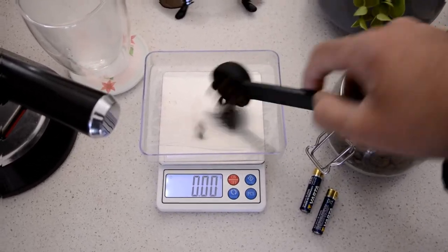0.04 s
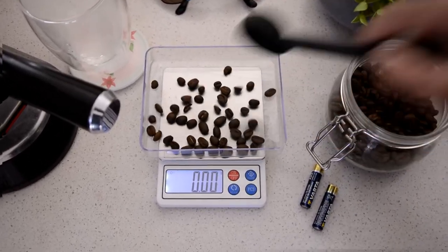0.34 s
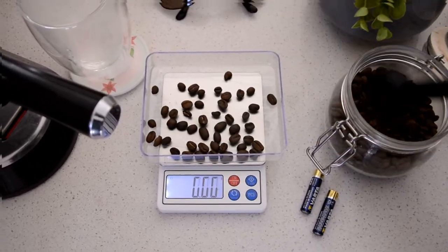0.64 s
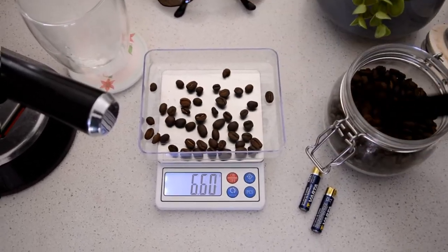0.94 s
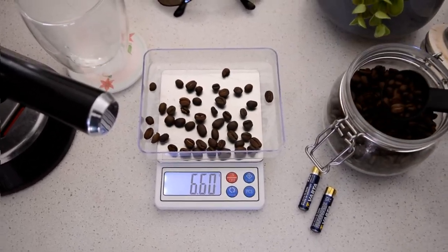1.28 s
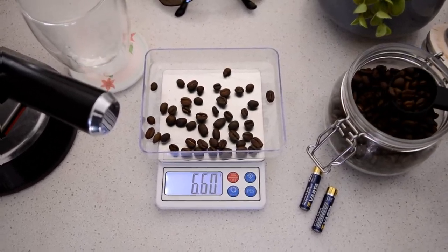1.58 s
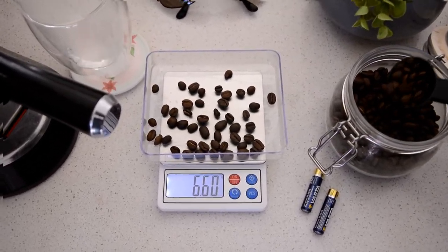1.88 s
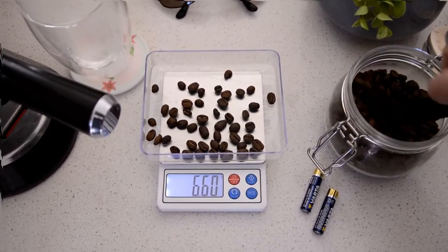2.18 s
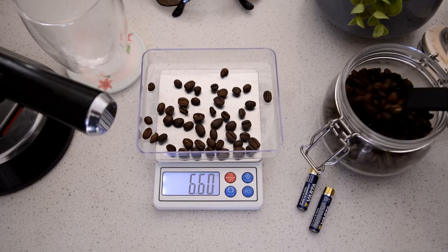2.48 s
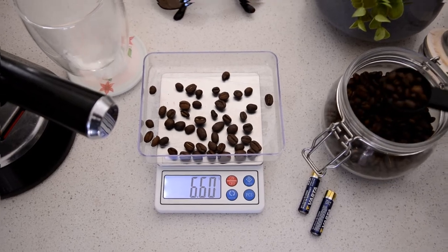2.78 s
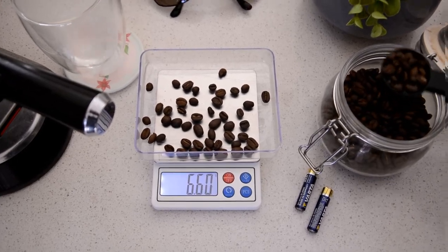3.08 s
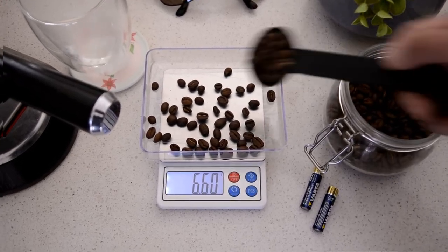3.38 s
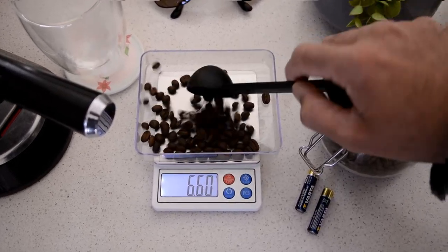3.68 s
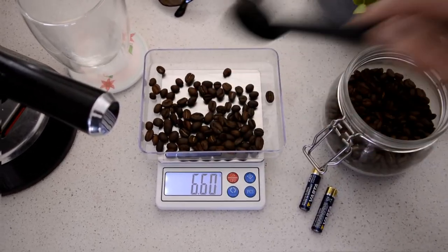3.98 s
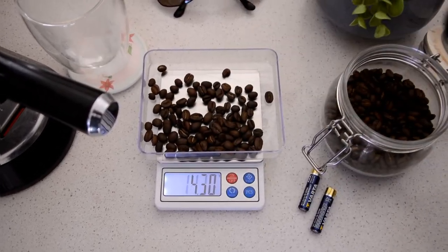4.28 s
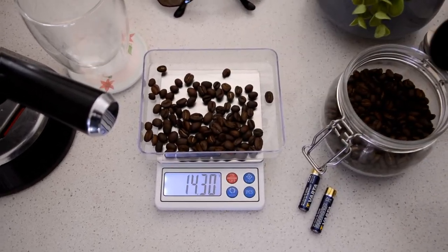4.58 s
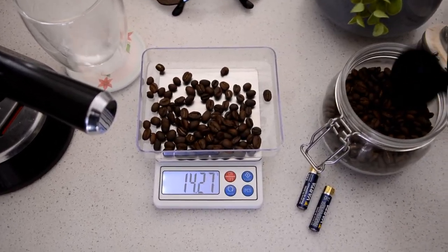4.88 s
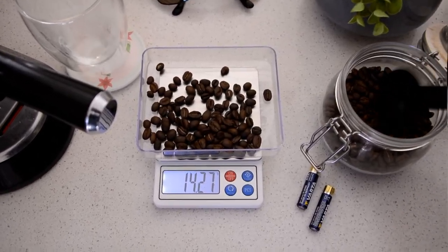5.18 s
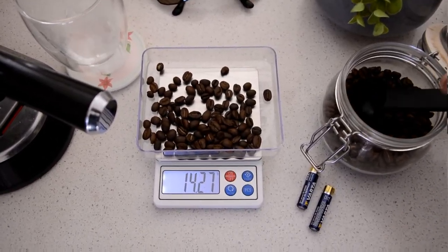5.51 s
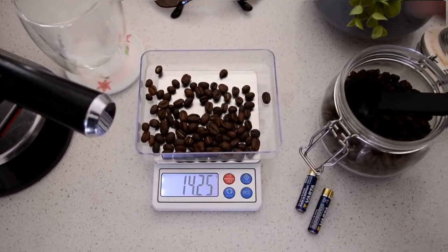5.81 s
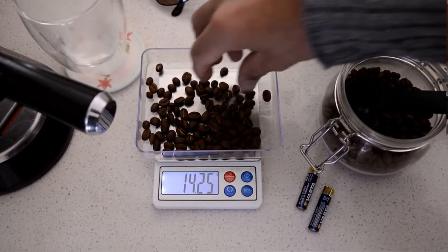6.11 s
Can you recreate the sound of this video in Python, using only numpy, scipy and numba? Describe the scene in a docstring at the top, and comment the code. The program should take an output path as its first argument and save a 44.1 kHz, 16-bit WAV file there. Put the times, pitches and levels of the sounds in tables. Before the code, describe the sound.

A fast, even rattle with soft thuds runs over a steady whir in a small kitchen, growing brighter as it goes. Close by, coffee beans click and bounce into a ringing plastic tray. A scoop scrapes and stirs through beans in a glass jar, then tips a second load into the tray. Faint stirring follows, while scattered ticks and hollow knocks continue to the end.

```python
"""A small, hard kitchen. Two scoops of roasted coffee beans are tipped into the plastic tray of a small
scale, clicking and ringing it; between them the scoop digs in a glass jar, where beans rub and slip.
All the while a fast, even rattle runs over a steady whir: eleven beats a second, each with two blows
and a soft thud, dull at first and brighter later, with stray ticks and hollow knocks."""
import sys
import numpy as np
from scipy import signal
from scipy.fft import rfft, irfft
from scipy.io import wavfile
from numba import njit

SR = 44100
rng = np.random.default_rng(int(sys.argv[2]) if len(sys.argv) > 2 else 0)


def wav_out(sig):
    """Save sig, one row per channel (or a flat mono array), as 16-bit PCM at SR to the path in sys.argv[1]."""
    wavfile.write(sys.argv[1], SR, np.round(np.clip(np.atleast_2d(sig).T, -1, 1) * 32767).astype(np.int16))


N = 275625
T = np.arange(N) / SR
SIDES = np.array([[1], [-1]])
BEAT_S = 4000 / SR  # one beat of the rattle
TOP_HZ = 15950


def amp(db):
    """Decibels to gain."""
    return 10 ** (np.asarray(db) / 20)


def unit(x):
    """Scale to rms 1."""
    return x / np.sqrt(np.mean(x ** 2))


def low_cut(x, hz):
    """Roll off the lows, 12 dB an octave."""
    return signal.sosfilt(signal.butter(2, hz, "high", fs=SR, output="sos"), x)


def colour(x, points, size=4096):
    """Minimum-phase EQ through (Hz, dB) points; the result has rms 1."""
    hz, db = np.transpose(points)
    bins = np.maximum(np.fft.rfftfreq(size, 1 / SR), 1)
    gain = amp(np.interp(np.log(bins), np.log(hz), db))
    cepstrum = irfft(np.log(gain))
    cepstrum[1:size // 2] *= 2
    cepstrum[size // 2 + 1:] = 0
    impulse = irfft(np.exp(rfft(cepstrum)))
    return unit(signal.fftconvolve(x, impulse[None])[:, :N])


def noise(side_db):
    """White noise; side_db sets its stereo width."""
    mid, side = rng.standard_normal((2, N))
    return unit(mid + amp(side_db) * side * SIDES)


def contacts(per_s, spread_db):
    """Tiny impacts at random moments, of uneven size and either sign."""
    hits = (rng.random(N) < per_s / SR) * rng.choice([-1, 1], N)
    return unit(hits * amp(spread_db * np.clip(rng.standard_normal(N), -2, 2)))


def grains(per_s, spread_db, side_db):
    """A dense, dry stereo crunch of tiny contacts."""
    return unit(contacts(per_s, spread_db) * noise(side_db))


def tails(hits, fall_s):
    """An envelope that jumps at each hit and decays."""
    return signal.lfilter([1], [1, -np.exp(-1 / (fall_s * SR))], np.abs(hits))


def swell(age, rise_s, fall_s):
    """Envelope of a blow: it builds up to age 0, then dies away."""
    return np.exp(np.minimum(age / rise_s, -age / fall_s))


def blows(times, levels_db, rise_s, fall_s, lag=2):
    """Summed envelopes of blows; each peaks lag rise times after its cue."""
    out = np.zeros(N)
    for s, db in zip(times, levels_db):
        near = slice(max(int(s * SR) - SR // 20, 0), int(s * SR) + SR // 5)
        out[near] += amp(db) * swell(T[near] - s - lag * rise_s, rise_s, fall_s)
    return out


def gestures(moves, attack_s, sag_db_per_s, release_db_per_s):
    """Summed envelopes of scoop moves: attack, a sagging hold, release."""
    out = np.zeros(N)
    for start_s, db, hold_s in moves:
        age = T - start_s
        held = np.maximum(age - attack_s, 0)
        drop_db = sag_db_per_s * held + release_db_per_s * np.maximum(held - hold_s, 0)
        out += np.clip(age / attack_s, 0, 1) ** 2 * amp(db - drop_db)
    return out


@njit
def ping_cloud(rows, fall_s, n):
    """Add up decaying sines, one for each (s, Hz, size, left phase, right phase)."""
    out = np.zeros((2, n))
    for s, hz, size, left, right in rows:
        step = np.exp((2j * np.pi * hz - 1 / fall_s) / SR)
        a, b = size * np.exp(1j * left), size * np.exp(1j * right)
        start = int(s * SR)
        for i in range(start, min(start + int(5 * fall_s * SR), n)):
            a, b = a * step, b * step
            out[0, i] += a.imag
            out[1, i] += b.imag
    return out


def pings(count, spread_db, fall_s, width_rad):
    """A cloud of tiny hard contacts, each ringing briefly at its own pitch; even in spectrum."""
    when, height, cycle = rng.random((count, 3)).T
    size, skew = np.clip(rng.standard_normal((count, 2)), -2, 2).T
    size = amp(spread_db * size) * np.sqrt(height)
    left, right = 2 * np.pi * cycle + width_rad * skew * SIDES
    rows = np.column_stack([when * N / SR, TOP_HZ * height ** 2, size, left, right])
    return unit(ping_cloud(rows, float(fall_s), N))


def rings(times, levels_db, pitches_hz, gain_db, rise_s, fall_s, width_rad, sag_per_s=0):
    """One short ring per cue, its pitch free to sag, its phase split left and right."""
    out = np.zeros((2, N))
    for s, db, hz, width in zip(times, levels_db, pitches_hz, np.broadcast_to(width_rad, len(times))):
        near = slice(max(int(s * SR) - SR // 50, 0), int(s * SR) + SR // 10)
        age = T[near] - s
        envelope = amp(db + gain_db) * swell(age - 0.876 * rise_s, rise_s, fall_s)
        phase = 2 * np.pi * hz * age * (1 - sag_per_s * age / 2)
        out[:, near] += envelope * np.sin(phase + rng.choice([-1, 1]) * width * SIDES)
    return out


def modes(hits, table):
    """Ring a bank of resonances, in a different balance for each hit, with the bass cut away."""
    ring = 0
    for hz, width_hz, db in table:
        r, w = np.exp(-np.pi * width_hz / SR), 2 * np.pi * hz / SR
        mode = signal.lfilter([1, 0, -1], [1, -2 * r * np.cos(w), r * r], hits * noise(side_db=-1))
        ring = ring + amp(db) * np.sqrt(1 - r) * mode
    return unit(low_cut(ring, 800))


# Scoops tipped into the tray. Each row: start in seconds, level in dB, hold in seconds.
POURS = [(-.045, -25, 0.16), (3.42, -25, 0.23)]
# Clumps that land together. Each row: time in seconds, level in dB.
CLUMPS = [(.014, -37), (0.047, -32), (.086, -25), (0.107, -25), (0.186, -30), (3.453, -38), (3.475, -32),
          (3.522, -26), (3.549, -27), (3.654, -32), (3.702, -27)]
# The tray's ring. Each row: pitch in Hz, bandwidth in Hz, level in dB.
TRAY_MODES = [(1372, 81, 1.5), (1660, 210, -0.5), (1900, 130, 1.5), (2475, 165, 8.5), (2970, 190, 1),
              (3280, 63, 0), (3530, 120, -1), (3850, 57, -3), (5030, 69, -1), (5750, 190, 0),
              (6780, 61, 1.5), (8000, 64, -7), (8350, 79, -11), (9400, 47, -6), (11050, 160, 1.5),
              (12300, 45, -17)]
# The bare click of a bean on plastic. Each row: frequency in Hz, gain in dB.
CLICK_EQ = [(60, -48), (200, -36), (480, -23), (750, -2.5), (1050, -2), (1400, 3.5), (2000, -11),
            (2900, -3), (4400, 1), (6500, 3), (9000, -0.5), (12000, 0.5), (16000, -1)]

def pour(ring_db=-4, click_db=-3):
    """Beans land and bounce, some in clumps; each chatters for a moment and rings the tray."""
    stream = gestures(POURS, attack_s=0.034, sag_db_per_s=32, release_db_per_s=98)
    clumps = blows(*np.transpose(CLUMPS), rise_s=0.0023, fall_s=0.0034)
    hits = contacts(per_s=2200, spread_db=3)
    chatter = tails(hits, fall_s=0.0049) * pings(90000, spread_db=2, fall_s=0.0013, width_rad=1.13)
    ring = amp(ring_db) * modes(hits, TRAY_MODES)
    clicks = amp(click_db) * colour(chatter, CLICK_EQ)
    return np.hypot(stream, clumps) * (ring + clicks)


# The tone of the whir. Each row: frequency in Hz, gain in dB.
WHIR_EQ = [(25, -49), (60, -11), (110, -5), (200, -12), (300, -16), (450, -3), (700, 7), (930, 10.5),
           (1400, 1.5), (3200, 0.5), (4500, -7), (6500, -7), (9000, -18.5), (16000, -9.5)]

def whir(level_db=-49):
    """Steady noise, a wide bed under everything."""
    return amp(level_db) * colour(noise(side_db=1), WHIR_EQ)


# Square hits on the bare tray. Each row: time in seconds, level in dB, pitch in Hz.
BEAN_STRIKES = [(.011, -23, 6890), (.012, -26, 1350), (.014, -27, 11210), (.019, -35, 2450),
                (.033, -37, 6830), (.047, -25, 2560), (.072, -39, 6790), (.084, -32, 2400),
                (.089, -24, 3220), (.107, -36, 2400), (3.546, -24.5, 2440), (3.559, -36, 5140),
                (3.567, -30, 2380), (3.596, -30, 2520), (3.607, -24, 6600), (3.614, -27, 2400),
                (3.635, -35, 2470), (3.655, -28, 6700), (3.694, -33, 11200)]

def bean_strikes():
    """A bean that finds the tray's bare floor rings one mode clearly."""
    return rings(*np.transpose(BEAN_STRIKES), gain_db=-2.5, rise_s=0.0018, fall_s=0.0032, width_rad=0.23)


# The rattle's tone over time. Each row: time in seconds, brightness from 0 (dull) to 1.
BRIGHTNESS = [(.5, 0.4), (.75, 0), (1.25, 0.16), (2.05, 0.11), (2.55, 0.22), (3.25, 0.42), (3.9, 0.66),
              (5.2, 0.91), (6.25, 0.85)]

def brightness():
    """How bright the rattle is at each moment."""
    return np.interp(T, *np.transpose(BRIGHTNESS))


def each_beat(at_s, rise_s, fall_s, scatter_db, jitter_s, hz=0, detune=0):
    """One pulse a beat, never quite the same: its envelope, or its ring if it has a pitch."""
    clock = T - at_s + BEAT_S / 3
    beat = np.floor(clock / BEAT_S).astype(int) + 1
    size, late, sharp = rng.standard_normal((N // 1000, 3))[beat].T
    age = clock % BEAT_S - BEAT_S / 3 - jitter_s * late
    tone = np.cos(2 * np.pi * hz * (1 + detune * sharp) * age)
    return amp(scatter_db * size) * swell(age, rise_s, fall_s) * tone


# The soft thud and its deep layer. Each row: frequency in Hz, gain in dB.
THUD_EQ = [(60, -35), (140, -21.5), (195, -10), (228, -19), (270, -2.5), (330, 0.5), (390, -5), (470, -14),
           (800, -16), (2000, -50), (8000, -70)]
DEEP_EQ = [(60, -44), (120, -25), (180, -2.5), (215, -2), (300, 5), (390, -24)]

def thuds(thud_db=-46, bright_drop_db=4, deep_db=-43.5, boom_db=-44.5):
    """The rattle's low end: a soft thud every beat, a deep double bump at first, and a pitched boom."""
    pulse = each_beat(0.0542, rise_s=0.0095, fall_s=0.032, scatter_db=1.5, jitter_s=0.002)
    bump = each_beat(0.0326, rise_s=0.0028, fall_s=0.014, scatter_db=-3.5, jitter_s=0.0008)
    thud = amp(thud_db - bright_drop_db * brightness()) * colour(noise(side_db=-6.5), THUD_EQ)
    # the deep layer swells early, then fades
    deep_fader = amp(deep_db) * swell(T - 0.62, rise_s=0.38, fall_s=1)
    deep = deep_fader * colour(noise(side_db=-28.5), DEEP_EQ)
    # the boom builds slowly to mid-scene and dies away faster
    boom_fader = amp(boom_db) * swell(T - 2.97, rise_s=1.4, fall_s=0.7)
    boom = each_beat(0.07, rise_s=0.049, fall_s=0.016, scatter_db=0.5, jitter_s=0.00027,
                     hz=258.7, detune=0.013)
    return pulse * thud + (bump + amp(-12) * pulse) * deep + boom_fader * boom


# Bright snaps among the beans. Each row: time in seconds, level in dB.
BEAN_SNAPS = [(.05, -29), (.279, -49), (.629, -36), (.705, -40), (1.994, -36), (2.088, -36), (3.436, -33),
              (3.454, -23), (3.474, -25), (3.521, -25), (3.805, -43), (5.209, -38)]

def bean_snaps():
    """A brittle bean hits or gives way in a crisp burst of treble."""
    crisp = unit(low_cut(grains(per_s=6200, spread_db=2, side_db=-2), 7500))
    return blows(*np.transpose(BEAN_SNAPS), rise_s=0.0011, fall_s=0.0076) * crisp


# Stray knocks. Each row: time in seconds, level in dB, pitch in Hz, stereo width in radians.
KNOCKS = [(0.057, -38, 970.0, 0.2), (0.078, -38, 970.0, 0.1), (0.122, -31.5, 857, 0.3),
          (0.158, -38, 944, 0.1), (1.386, -35, 1410, 0.12), (1.391, -28.5, 1620, 0.25),
          (1.396, -29, 1505, 0.12), (1.405, -40, 1650, 0.41), (1.819, -37, 900.0, 0.2),
          (3.352, -38, 910, 1.1), (3.712, -23, 936, 0.2), (3.721, -25.5, 940, 0.2),
          (3.749, -32.0, 924, 0.1), (3.801, -27.5, 976, 0.2), (3.941, -25.5, 832, 0),
          (4.713, -29, 928, 0.1), (4.841, -26.5, 870.0, 0), (4.885, -33, 930.0, 0.4),
          (5.296, -29, 1050.0, 0.1), (5.48, -31, 924, 0.1), (5.624, -27.5, 890, 1.4),
          (5.65, -37, 990.0, 1.1), (5.747, -29, 930, 0.6), (5.849, -23, 1000, 0.42), (5.922, -33, 870, 0.0),
          (5.945, -31.5, 783, 0.1), (6.019, -22.5, 920.0, 0.98), (6.054, -31, 960, 0.0), (6.1, -37, 860, 0)]

def knocks():
    """Hollow knocks, each a few cycles of one resonance."""
    s, db, hz, width = np.transpose(KNOCKS)
    return rings(s, db, hz, gain_db=4, rise_s=0.0035, fall_s=0.0023, width_rad=width)


# Hard clacks. Each row: time in seconds, level in dB, body against crack in dB.
CLACKS = [(0.279, -39, -27), (0.444, -41, -1), (0.629, -50, -10), (1.395, -33.5, 11.5), (1.851, -37.5, 9),
          (5.206, -32.5, -22)]
# A crisp tone for cracks and rubbing beans, a dull one for clack bodies and the rattle.
# Each row: frequency in Hz, gain in dB.
CRISP_EQ = [(200, -66), (700, -8), (1500, 1), (2800, 5.5), (4500, -0.5), (7000, -1.5), (10000, -3.5),
            (13000, 0), (16000, -11)]
DULL_EQ = [(60, -58.5), (130, -8), (190, -7.5), (300, -6), (500, -25.5), (700, 0.5), (950, -3), (1200, 1),
           (1500, -1), (1820, 3), (2200, -6), (3400, -15), (5000, -16), (16000, -40)]

def clacks():
    """Harder blows: a broad crack over a dull body."""
    s, db, body_db = np.transpose(CLACKS)
    crack = blows(s, db, rise_s=0.0015, fall_s=0.016) * colour(noise(side_db=-1.5), CRISP_EQ)
    body = blows(s, db + body_db, rise_s=0.0012, fall_s=0.005) * colour(noise(side_db=-4), DULL_EQ)
    return crack + low_cut(body, 600)


def beat_start(s):
    """Start of the beat that holds each moment."""
    return np.floor(s / BEAT_S) * BEAT_S


def first_blow_times(s, settled_s=0.038, early_s=0.017, settling_s=2.07):
    """The first blow starts out early, then slips later in the beat."""
    return beat_start(s) + settled_s - early_s * np.exp(-s / settling_s)


# The rattle's beats. Each row: second blow's time in seconds, first blow's level in dB, its ring
# in Hz, second blow's level in dB, its pop's level in dB, pop pitch in Hz, closing hiss in dB.
BEATS = [(0.328, -40, 1240, -35, -42, 1180, -59), (0.414, -38.5, 1200, -37, -42, 1250, -63),
         (0.503, -38.0, 1460.0, -52, -38.5, 1520.0, -72), (0.593, -37.5, 1190, -38, -44, 1180, -67),
         (0.681, -33, 1440, -42.0, -40, 1160, -65), (0.775, -31, 1660, -34, -32, 1265, -57),
         (0.864, -35.5, 1470, -32, -32, 1204, -49), (0.953, -33.5, 1430, -39, -30.5, 1490, -48),
         (1.043, -34, 1540, -42, -30, 1490, -51), (1.137, -35, 1410, -34, -28.5, 1570, -63.0),
         (1.226, -36, 1080, -47, -29, 1526, -56), (1.319, -34, 1780.0, -32, -32.5, 1600, -70),
         (1.409, -36.0, 1600.0, -51, -29, 1760.0, -55), (1.497, -33, 1230.0, -36, -34.5, 1540, -54),
         (1.591, -33.5, 1780, -34.5, -32.5, 1460, -52), (1.682, -34.5, 1400, -36, -35, 1160.0, -65.5),
         (1.772, -34.5, 1190, -33, -33.5, 1430, -50.0), (1.865, -34.5, 1090, -41, -36, 1370.0, -52),
         (1.954, -35, 1590.0, -34, -38, 1380, -52), (2.042, -32.5, 1490.0, -40, -41, 1520, -62.0),
         (2.133, -35.5, 1900, -38, -43, 1760, -64), (2.223, -34.5, 1440, -39, -34.5, 1700, -58),
         (2.32, -33.5, 1290.0, -33, -41, 1190, -42.5), (2.408, -33, 1570, -45, -30.5, 1710, -45),
         (2.498, -34, 1230, -38.0, -30.5, 1710, -40.5), (2.591, -30, 1630, -36.5, -35, 1800, -39),
         (2.681, -32.5, 1170, -33, -31, 1820, -49), (2.771, -32.5, 1470.0, -34, -29, 1810, -62),
         (2.859, -32.5, 1450, -30, -32, 1740, -62), (2.952, -34.5, 1240, -34, -30, 1744, -57),
         (3.041, -31.5, 1570, -40, -30.5, 1636, -39.5), (3.132, -33.5, 1140, -34, -30, 1710, -46),
         (3.223, -34.5, 1050, -32.5, -31, 1480, -46), (3.314, -33.5, 1140.0, -34, -31.5, 1500.0, -51.0),
         (3.402, -31.5, 1510.0, -39, -35, 1450.0, -43), (3.769, -28, 1540.0, -46, -37, 1800, -59),
         (3.863, -30, 1700, -34, -44, 1730.0, -61), (3.956, -32, 1850.0, -31, -30, 1210, -53.0),
         (4.047, -31.5, 1710, -38, -35, 1250, -55.5), (4.14, -32, 1060, -36, -33, 1870, -52.0),
         (4.228, -32, 1750, -38.0, -34, 1220, -45), (4.322, -32, 1540, -38, -32, 1250.0, -47),
         (4.409, -29, 1220, -31, -34.0, 1060, -51), (4.503, -30.5, 1640.0, -37, -45, 1290, -50),
         (4.595, -30.5, 1260, -35.0, -32, 1220.0, -45), (4.684, -29.5, 1820, -41, -34, 1510, -55),
         (4.768, -31.5, 1280, -40, -32, 1170, -40), (4.866, -30, 1050, -32.5, -41, 1180, -49),
         (4.959, -29, 1750, -42, -34, 1080.0, -53), (5.043, -31.5, 1250, -45, -43, 1140.0, -61),
         (5.137, -31, 1220, -29, -36, 1190, -55), (5.229, -29.5, 1180, -44, -32, 1200, -49.0),
         (5.325, -31, 1150, -46, -31, 1230.0, -52), (5.403, -31, 1790, -30, -44, 1710, -44),
         (5.499, -30.0, 2260, -36, -28, 1206, -57), (5.587, -28, 1690, -39, -32, 1210, -46.5),
         (5.674, -31, 1080, -46, -36, 1190, -48.0), (5.773, -30, 1140, -34, -36, 1790.0, -52.5),
         (5.862, -30.5, 1090, -32.5, -32, 1660, -40.5), (5.954, -31, 2700.0, -38, -32.5, 1560, -49),
         (6.044, -31, 1060.0, -31, -33, 1710, -42.5), (6.134, -31, 1490, -31.5, -33.5, 1640, -60),
         (6.224, -30.5, 1160, -30.5, -31, 1634, -45)]
# The tone of the rattle when bright. Each row: frequency in Hz, gain in dB.
BRIGHT_EQ = [(60, -34), (130, -20), (190, -6), (500, -1.5), (850, 2), (1200, -0.5), (1800, -3),
             (2300, -2.5), (3400, 2.5), (4600, -8), (6300, -4), (8500, -11.5), (12500, -9.5), (16000, -6.5)]
# The ring in the bright rattle. Each row: pitch in Hz, bandwidth in Hz, level in dB.
RATTLE_MODES = [(973, 310, 11), (1211, 27, 4.5), (1526, 120, 5), (1810, 79, 5.5), (2250, 440, 4.5),
                (2924, 160, 4), (3300, 230, -8), (6140, 110, -14.5)]

def rattle(dull_db=-4, bright_db=-4, ring_db=-2):
    """Two blows a beat, crossfading between a dull patter and a bright, ringing chatter."""
    s, first_db, _, second_db, *_ = np.transpose(BEATS)
    first = blows(first_blow_times(s), first_db - 0.5, rise_s=0.0047, fall_s=0.022, lag=0)
    second = blows(s, second_db, rise_s=0.0064, fall_s=0.005, lag=0)
    dull = amp(dull_db) * colour(pings(50000, spread_db=2, fall_s=0.0012, width_rad=0.5), DULL_EQ)
    bright = amp(bright_db) * colour(pings(50000, spread_db=3.5, fall_s=0.002, width_rad=0.92), BRIGHT_EQ)
    ring = amp(ring_db) * modes(contacts(per_s=1000, spread_db=1), RATTLE_MODES)
    blend = brightness()
    return np.hypot(first, second) * (np.sqrt(1 - blend) * dull + np.sqrt(blend) * (bright + ring))


def pops(tail_centre_hz=1190):
    """The first blow rings faintly; the second is a round pop that falls in pitch."""
    s, first_db, first_hz, _, pop_db, pop_hz, _ = np.transpose(BEATS)
    dullness = 1 - brightness()
    lead = rings(first_blow_times(s), first_db, first_hz,
                 gain_db=-4.5, rise_s=0.0016, fall_s=0.0067, width_rad=0.56)
    pop = rings(s - 0.002, pop_db + 3 * np.interp(s, T, dullness), pop_hz,
                gain_db=2, rise_s=0.0016, fall_s=0.003, width_rad=0.25, sag_per_s=12)
    # while the rattle is dull, each pop ends on much the same pitch
    tail_hz = tail_centre_hz * (1 + 0.024 * rng.standard_normal(len(s)))
    tail = rings(s + 0.00396, pop_db, tail_hz, gain_db=0.5, rise_s=0.002, fall_s=0.004, width_rad=0.35)
    return lead + pop + dullness * tail


def hiss(gain_db=2, at_s=0.0748):
    """A fine hiss swells and fades late in each beat."""
    s, *_, db = np.transpose(BEATS)
    swish = blows(beat_start(s) + at_s, db + gain_db, rise_s=0.0068, fall_s=0.012, lag=0)
    sand = pings(40000, spread_db=4.5, fall_s=0.0013, width_rad=1.05)
    return swish * unit(low_cut(sand, 9000))


# Stray ticks. Each row: time in seconds, ring level in dB, pitch in Hz, scrape level in dB.
TICKS = [(0.346, -37, 2910, -43.5), (0.993, -36, 3410, -39), (1.326, -35.5, 2360, -43.5),
         (1.524, -39, 2180, -37), (1.62, -35.5, 2430, -47.5), (1.801, -36.5, 2370.0, -38),
         (1.882, -28.5, 2030, -45.5), (2.071, -43, 2420.0, -42), (2.24, -34, 2344, -40),
         (2.424, -31, 3340, -42.5), (2.516, -34, 3450.0, -41.5), (2.612, -33, 3270.0, -41.5),
         (2.708, -43, 2410, -44), (2.816, -39, 3255, -39.5), (2.979, -43, 3430.0, -39.5),
         (3.049, -36, 2850, -35), (3.154, -52, 3400.0, -43), (3.254, -49.0, 3300, -48.5),
         (3.327, -34.5, 3320.0, -37.5), (3.861, -35.0, 2980, -38.5), (3.886, -40, 3130, -56),
         (3.973, -37, 3200, -41), (4.146, -39, 2460.0, -39.5), (4.17, -39, 2430.0, -48),
         (4.249, -35, 3450, -45), (4.336, -45.0, 3420.0, -42.5), (4.357, -34, 2190, -55),
         (4.537, -43, 2910.0, -46), (4.607, -41.0, 3030.0, -42), (4.762, -43, 2820, -34.5),
         (4.886, -36.5, 2310, -42.5), (5.037, -40, 3030, -34), (5.078, -39, 3330, -43.5),
         (5.16, -40.5, 2700.0, -47), (5.314, -40, 2930, -34.5), (5.486, -49, 2230, -36.5),
         (5.516, -32, 1960, -56), (5.534, -37, 2930, -50), (5.606, -35, 3260, -41), (5.628, -32, 2540, -49),
         (5.696, -41, 3110, -40.5), (6.058, -31.0, 3100, -40.5), (6.077, -32, 2210.0, -45.5)]
# The tone of their scrape. Each row: frequency in Hz, gain in dB.
TICK_EQ = [(500, -11.5), (1500, 3), (2300, 7), (2750, 3), (3300, 6), (4400, -4), (5400, 0.5), (6200, 5),
           (7200, 4), (9000, -12), (12500, -3), (16000, -61)]

def ticks(upper_centre_hz=6133):
    """Short bright scrapes in some beats, each with a crisp edge and a small ring."""
    s, ring_db, hz, scrape_db = np.transpose(TICKS)
    grit = colour(pings(50000, spread_db=-3, fall_s=0.0025, width_rad=0.88), TICK_EQ)
    scrape = blows(s, scrape_db + 3, rise_s=0.0012, fall_s=0.0083) * grit
    crunch = grains(per_s=4000, spread_db=1, side_db=-8)
    edge = low_cut(blows(s, scrape_db - 2, rise_s=0.00087, fall_s=0.0063) * crunch, 4000)
    # a higher ring sounds too, a little differently each time
    upper_hz = upper_centre_hz * (1 + 0.046 * rng.standard_normal(len(s)))
    upper = rings(s, scrape_db, upper_hz,
                  gain_db=2.5, rise_s=0.0044, fall_s=0.0029, width_rad=0.68, sag_per_s=3.1)
    ring = rings(s, ring_db, hz, gain_db=3, rise_s=0.0019, fall_s=0.0033, width_rad=0.62)
    return scrape + edge + upper + ring


# Short shoves and long, gentle stirs in the jar. Each row: start in seconds, level in dB, hold in seconds.
DIGS = [(0.613, -41, 0.0094), (0.681, -44.5, 0.022), (0.957, -50, 0.02), (1.424, -52.5, 0.017),
        (1.967, -41, 0.042), (2.029, -39.5, 0.078), (2.21, -59, 1.7), (4.96, -57, 1.04)]

def dig(slide_db=-9, slip_db=-2, floor_db=-66):
    """Beans slide and give way against the scoop in crackling slips; a faint rustle runs throughout."""
    slips = unit(tails(contacts(per_s=70, spread_db=11.5), fall_s=0.046))
    pushes = gestures(DIGS, attack_s=0.015, sag_db_per_s=4, release_db_per_s=165)
    effort = np.hypot(pushes, amp(floor_db)) * np.hypot(amp(slide_db), amp(slip_db) * slips)
    return effort * colour(pings(60000, spread_db=2, fall_s=0.00045, width_rad=0.94), CRISP_EQ)


# Scrapes of the scoop's edge. Each row: start in seconds, level in dB, hold in seconds.
SCOOP_SCRAPES = [(0.618, -47, 0.097), (1.038, -46.5, 0.024), (1.432, -46.5, 0.013), (2.062, -50, 0.032)]
# Their grating tone. Each row: frequency in Hz, gain in dB.
SCRAPE_EQ = [(400, -20), (1200, 1), (2100, 6), (3200, 4.5), (4500, -7), (6200, -2), (9000, -9), (16000, -3)]

def scoop_scrapes():
    """The scoop's edge grates through the beans, lower and coarser than their rustle."""
    push = gestures(SCOOP_SCRAPES, attack_s=0.0037, sag_db_per_s=20, release_db_per_s=350)
    return push * colour(grains(per_s=1600, spread_db=-1, side_db=-8), SCRAPE_EQ)


def reflections(decay_s, predelay_s=0.00236, size=32768):
    """A dense train of echoes with unit energy and an even spectrum."""
    age = np.arange(size) / SR - predelay_s
    fade = (age > 0) * amp(-60 * np.abs(age) / decay_s)
    spectrum = rfft(rng.standard_normal(size) * fade)
    echo = irfft(spectrum / np.abs(spectrum)) * np.sqrt(fade)
    return echo / np.sqrt(np.sum(echo ** 2))


def kitchen(x, wet_db, decay_s):
    """Counter and walls add a short tail, different on each side."""
    echoes = np.array([reflections(decay_s) for _ in SIDES])
    return x + amp(wet_db) * signal.fftconvolve(x, echoes, axes=1)[:, :N]


def scene():
    """Beans up close, the rattle beside them, the whir underneath."""
    beans = pour() + bean_strikes() + bean_snaps() + dig() + scoop_scrapes()
    beans = kitchen(beans, wet_db=-1.5, decay_s=0.11)
    clatter = rattle() + pops() + thuds() + ticks() + hiss() + clacks() + knocks()
    clatter = kitchen(clatter, wet_db=-5, decay_s=0.26)
    return amp(2.5) * beans + amp(-2.34) * clatter + whir()


def record(dry):
    """Master EQ: shed the deepest bass and cut the top steeply."""
    high_cut = signal.ellip(12, 0.1, 80, TOP_HZ, fs=SR, output="sos")
    return signal.sosfilt(high_cut, low_cut(dry, 48))


dry = scene()
out = record(dry)
wav_out(out)
```